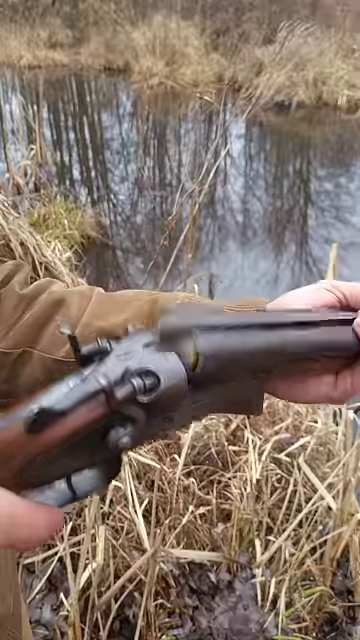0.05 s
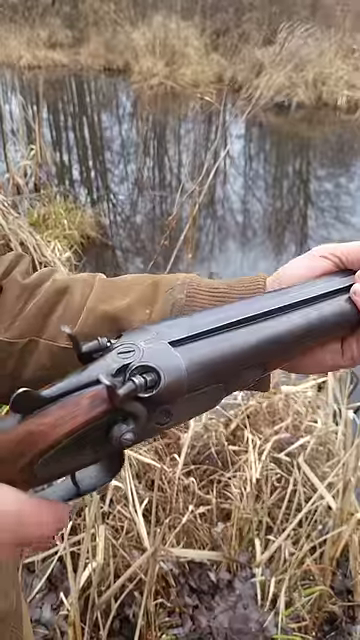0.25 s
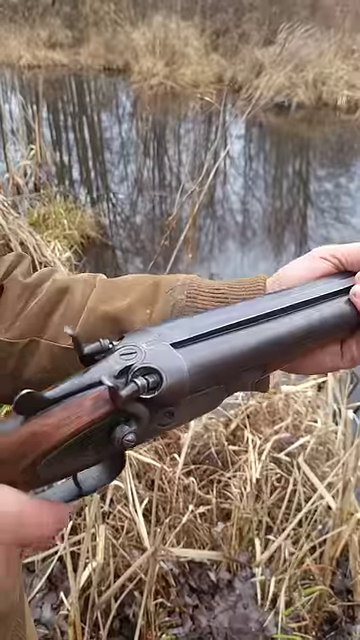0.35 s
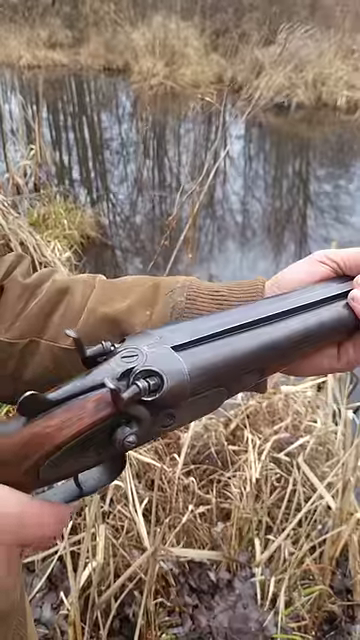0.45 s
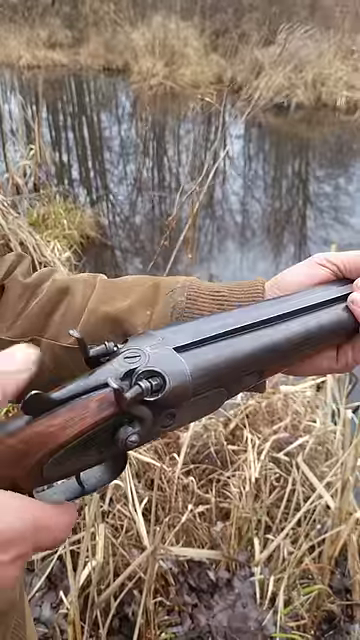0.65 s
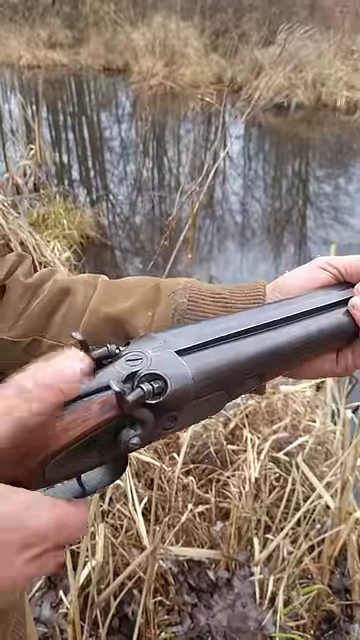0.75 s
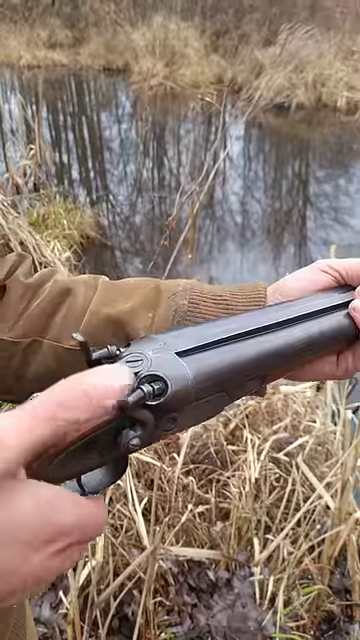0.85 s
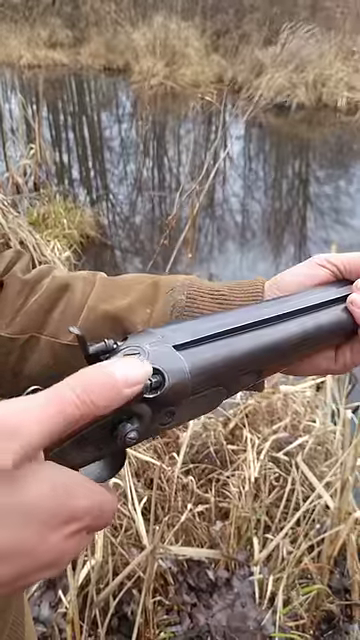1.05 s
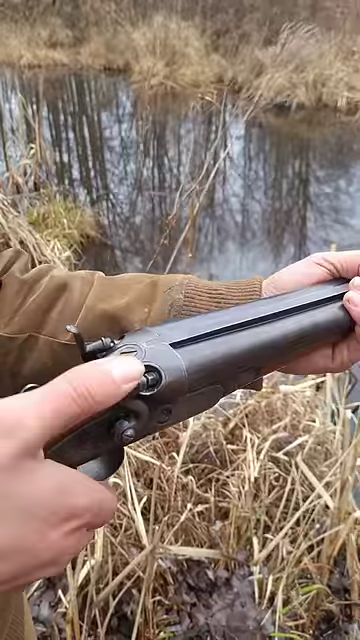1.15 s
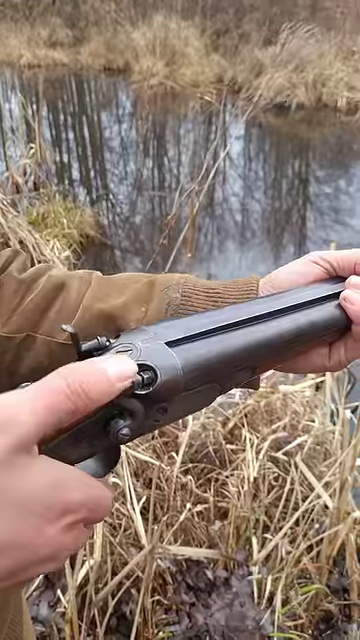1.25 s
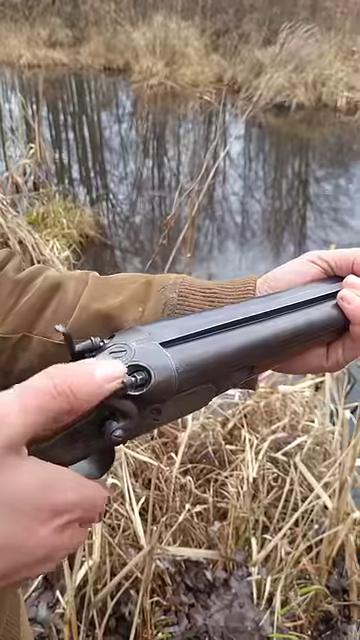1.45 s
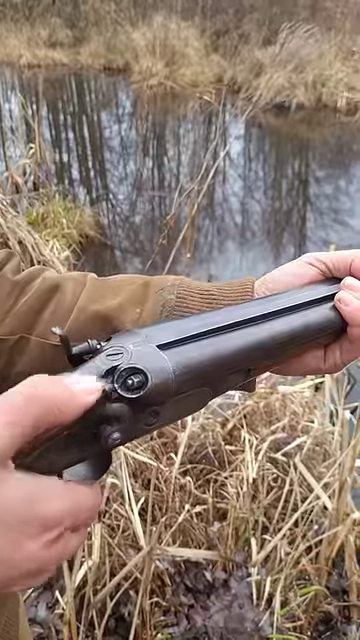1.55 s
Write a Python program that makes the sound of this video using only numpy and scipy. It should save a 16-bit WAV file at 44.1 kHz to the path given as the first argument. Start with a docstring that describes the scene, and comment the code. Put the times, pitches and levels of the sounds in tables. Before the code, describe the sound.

Loud steel clack of a break-action shotgun closing beside a pond, then a soft handling knock

```python
"""A faint rising rub, a fading scrape and a burst of steel clacks: a double-barrel shotgun is swung shut.
It closes an arm's length from a phone on a reedy pond bank, over a low outdoor rumble; later comes a soft knock.
Each metal contact is an impulse that rings modes and filtered noise; scrape and rub are shaped noise.
The thump of the jolt is a swelling low sine. Noise tails scatter the gun off shooter, ground and reeds,
return it from single trunks and banks, and bring it back faintly from the wood across the water."""
import sys
import numpy as np
from scipy import signal
from scipy.fft import rfft, irfft
from scipy.io import wavfile

SR = 44100
rng = np.random.default_rng(int(sys.argv[2]) if len(sys.argv) > 2 else 0)


def transcribe(u):
    """Save the signal u as a 16-bit wav file named by the first command-line argument.

    u: samples, shape (n,) or (channels, n), limited to [-1, 1]; the rate is SR.
    q: integer samples, one column per channel.
    """
    v = np.clip(np.atleast_2d(u).T, -1, 1)
    q = np.round(v * 32767).astype(np.int16)
    wavfile.write(sys.argv[1], SR, q)


N = 70560  # 1.6 s

# In every table the dB are relative: the gain of the layer comes on top.
# Metal contacts of the action. Each row: time in seconds, push on the body in dB,
# shake of the steel in dB, bright tick in dB.
METAL_CONTACTS = [(.1922, -41.5, -43, -60.5), (0.194, -43, -32, -39.5), (0.1985, -27.5, -20.5, -23.5),
                  (0.2003, -23, -15.5, -25.5), (.2128, -23.5, -22, -21), (.2147, -16, -21.5, -29),
                  (.2180, -26.5, -26, -44), (.2305, -29, -36, -43.5), (.23736, -17, -5, -9.5),
                  (.23831, -12, -0.5, -14.5), (.23992, -11, -6.5, -7), (.2420, 0.5, 0, -11),
                  (.24343, -10.5, -3.5, -4), (.2440, -40, 1, 5.5), (.24512, 5, -0.5, 0),
                  (.25051, -9.5, -8.5, -5), (.25268, -7, -10.5, -6), (.25349, -8.5, -12.5, -9.5),
                  (.25859, -25, -27.5, -10), (.26096, -16.5, -15, -12), (.26346, -17, -17.5, -22.5),
                  (.28141, -30, -30, -32)]

# Modes of barrels, frame and stock. Each row: pitch in Hz, t60 in seconds, left in dB, right in dB.
BODY_MODES = [(327, 0.068, -16.5, -17.5), (479, 0.053, -5.5, -24), (607, 0.05, -27.5, -20.5),
              (731, 0.051, -24, -5), (880, 0.052, -12, -9.5), (954.4, 0.039, -21, -13.5),
              (1214, 0.029, -5, -8), (1316, 0.048, -18, -5), (1442, 0.026, -15, 1), (1521, 0.054, -6, -8),
              (1715, 0.058, -16.5, -15), (1973, 0.039, -22.5, -5.5), (2402, 0.045, -15.5, -22.5),
              (3115, 0.05, -17.5, -14)]
BODY_DB, BODY_LOW_HZ, RIGHT_LAG_S = -18.5, 304, .00015

# Colour of the dull knock in each push. Each row: frequency in Hz, left in dB, right in dB.
KNOCK_COLOUR = [(96, -28, -24), (322, -8.5, -13.5), (600, -13.5, -2), (867, -1.5, 8), (1066, -6.5, -11),
                (1350, 0, 9.5), (2000, -6, -0.5), (4000, -27, -33.5), (8997, -48.5, -48)]
KNOCK_DB = 14.5

# Around this pitch the flexing gun drives the two microphones in opposite phase.
TURN_HZ, TURN_WIDTH_HZ = 400, 90

# Colour of the dense high steel modes. Each row: frequency in Hz, left in dB, right in dB.
STEEL_COLOUR = [(200, -28, -28), (900, -16.5, -15), (1600, -6.5, -6), (2400, 3, 3), (3200, 1.5, 1.5),
                (3900, 5, -4), (4800, -6.5, -6.5), (5800, -1, -15), (7080, -1, -23), (8300, -19.5, -42.5),
                (15000, -35.5, -46)]
STEEL_DB, STEEL_SEED_T60_S = 8, .022  # t60 of the noise before crack() evens its spectrum

# Faint ringing of the barrel tubes. Each row: pitch in Hz, t60 in seconds, level in dB.
TUBE_MODES = [(3510, 1, -77.5), (3640, .65, -75), (3560, .55, -75), (3800, .4, -74)]
TUBES_RIGHT_DB = -5.5

# Colour of the tick of the hard edges. Each row: frequency in Hz, left in dB, right in dB.
TICK_COLOUR = [(1000, -29.5, -30.5), (5030, -8, -17.5), (7300, -6, -23), (8500, -16.5, -39),
               (10100, -2.5, -11), (11000, -4, -9.5), (12500, 1, -4.5), (15300, 0.5, -8),
               (16500, -14.5, -20)]
TICK_DB, TICK_SEED_T60_S = 2, .012

# Colour of the sliding bolt. Each row: frequency in Hz, left in dB, right in dB.
SLIDE_COLOUR = [(120, -20.5, -23), (250, -14.5, -11.5), (400, 2, -4), (600, -2.5, -7.5), (950, 1, 2),
                (1300, 0, 3), (1700, -4, -3), (2150, 0, 3), (2750, -3.5, -2), (3175, 1.5, 0),
                (4200, -12, -13.5), (7000, -16, -30), (9000, -38, -43.5), (15000, -35.5, -42.5)]
SLIDE_START_S, SLIDE_END_S = .198, .237
SLIDE_DB, SLIDE_FADE_DB_PER_S = -24, 260
SLIDE_GRAIN = 1.1  # unevenness of the slips

# Low thump of the gun in the hands.
JOLT_S, JOLT_HZ, JOLT_DB = .2452, 58.5, -27
JOLT_PEAK_S, JOLT_WIDTH_S = .268, .020

# Colour of the rubbing hinge. Each row: frequency in Hz, level in dB.
HINGE_COLOUR = [(200, -12.5), (600, 0), (1800, -0.5), (3500, -8), (6000, -20), (15000, -29.5)]
HINGE_DB, HINGE_RISE_DB_PER_S, HINGE_END_S = -57, 246, .195

# Colour of the soft knock of handling. Each row: frequency in Hz, level in dB.
TAP_COLOUR = [(300, -12), (1000, -13), (1650, 4), (2300, -9), (6000, -37)]
TAP_S, TAP_DB, TAP_T60_S = .571, -29.5, .16

# Colour of the scatter from shooter and ground. Each row: frequency in Hz, level in dB.
NEAR_COLOUR = [(200, 0), (1000, -3), (2200, 1), (3800, 1), (5000, 2), (7000, -2), (8500, -3), (10500, 4),
               (16000, 3)]
NEAR_DB, NEAR_T60_S = -23.5, .15

# Colour of the scatter from the reeds. Each row: frequency in Hz, level in dB.
REEDS_COLOUR = [(300, -11.5), (1400, -4), (2600, 1.5), (3200, 0.5), (3700, 6.5), (4200, -7.5), (7000, -15),
                (15000, -23)]
REEDS_DB, REEDS_T60_S = -40.5, .8

# Echoes from single trunks and banks. Each row: delay in seconds, level in dB, t60 in seconds.
TRUNK_ECHOES = [(.132, -46.5, .05), (0.387, -66.5, 0.04), (.494, -55, 0.027), (.528, -55, 0.0084)]
# Colour of those echoes. Each row: frequency in Hz, level in dB.
TRUNK_COLOUR = [(300, -36), (1300, -10.5), (2800, 7.5), (3800, -4.5), (5500, -17.5), (14000, -16)]

# Colour of the wood across the pond. Each row: frequency in Hz, level in dB.
WOOD_COLOUR = [(300, 0), (1200, -3), (1800, -7), (2800, 2.5), (3500, -11), (5400, -6.5), (7000, -24),
               (14000, -25)]
WOOD_DELAY_S, WOOD_RISE_S, WOOD_HOLD_S, WOOD_T60_S, WOOD_DB = .46, .21, .16, .4, -44.5
FAR_CROSSFEED = .15  # share of each side that reeds and distant echoes carry to the other

# Colour of the outdoor rumble. Each row: frequency in Hz, density in dB per Hz.
AIR_COLOUR = [(15, -43), (25, -13), (64, 1.5), (97, -1.5), (120, -3.5), (170, -15), (195, -18.5),
              (229, -14), (270, -24), (309, -19), (503, -29), (659, -25), (1330, -34.5), (1700, -50),
              (16000, -65.5)]
AIR_DB, AIR_SHARED_HZ, AIR_SIDE = -59, 300, .66

TOP_HZ = 15900  # upper limit of the phone


def undb(db):
    """Decibels to gain."""
    return 10 ** (np.asarray(db) / 20)


def colour(x, points, channels=1):
    """Minimum-phase filter through (Hz, dB) points; with two channels, a dB column for each."""
    p, size = np.array(points, float), 2 * N
    log_hz = np.log(np.maximum(np.fft.rfftfreq(size, 1 / SR), 1))
    curves_db = [np.interp(log_hz, np.log(p[:, 0]), p[:, 1 + c]) for c in range(channels)]
    cepstrum = irfft(np.log(undb(curves_db)))
    # Folding the cepstrum forward in time makes the filter causal.
    cepstrum[:, 1:N] *= 2
    cepstrum[:, N + 1:] = 0
    response = np.exp(rfft(cepstrum))
    return irfft(rfft(x, size) * response)[:, :N]


def low_cut(x, hz, order):
    """High-pass filter."""
    return signal.sosfilt(signal.butter(order, hz, "high", fs=SR, output="sos"), x)


def ring(x, response):
    """Play a sound through an impulse response."""
    return irfft(rfft(x, 2 * N) * rfft(response, 2 * N))[..., :N]


def fade(t60, start=0):
    """Exponential decay from a start time, 60 dB down after t60."""
    t = np.arange(N) / SR - start
    return (t >= 0) * np.exp(-np.log(1000) * np.maximum(t, 0) / t60)


def swell(start, rise, hold, t60):
    """Linear attack, hold, exponential release."""
    t = np.arange(N) / SR - start
    release = np.exp(-np.log(1000) * np.maximum(t - rise - hold, 0) / t60)
    return np.clip(t / rise, 0, 1) * release


def unit_energy(x):
    """Scale each channel to an energy of one."""
    return x / np.sqrt(np.sum(x ** 2, axis=1, keepdims=True))


def diffuse(envelope):
    """Dense random response of unit energy under an envelope, different at each microphone."""
    return unit_energy(rng.standard_normal((2, N)) * envelope)


def crack(t60):
    """Short diffuse response whose spectrum is evened out twice, each time under a longer fade."""
    x = diffuse(fade(t60))
    for _ in range(2):
        spectrum = rfft(x)
        flat = irfft(spectrum / (abs(spectrum) + 1e-12), N)
        x = flat * fade(10 * t60)
    return unit_energy(x)


def action():
    """Each contact of the closing gun knocks the body, shakes steel and barrel tubes, and ticks."""
    blows = np.zeros((3, N))
    for s, *db in METAL_CONTACTS:
        blows[:, int(s * SR)] += undb(db)
    push, shake, edge = blows
    low = turn_right(body(push) + knock(push))
    return low + steel(shake) + tick(edge) + tubes(shake)


def body(push):
    """Barrels, frame and stock ring as decaying sines that start slightly later on the right."""
    t = np.arange(N) / SR
    arrival = np.maximum([t, t - RIGHT_LAG_S], 0)
    modes = np.zeros((2, N))
    for hz, t60, left, right in BODY_MODES:
        modes += undb([[left], [right]]) * np.sin(2 * np.pi * hz * arrival) * fade(t60)
    return undb(BODY_DB) * low_cut(ring(push, modes), BODY_LOW_HZ, order=2)


def knock(push):
    """Each push is also a dull knock: its bare impulse, coloured for each microphone."""
    return undb(KNOCK_DB) * colour(push, KNOCK_COLOUR, channels=2)


def turn_right(x):
    """All-pass on the right channel: the low bending modes reach the microphones out of step."""
    b, a = signal.iirnotch(TURN_HZ, TURN_HZ / TURN_WIDTH_HZ, fs=SR)
    return np.array([x[0], signal.lfilter(2 * b - a, a, x[1])])


def steel(shake):
    """High steel modes lie so close together that they ring as a short burst of coloured noise."""
    burst = ring(shake, crack(STEEL_SEED_T60_S))
    return undb(STEEL_DB) * colour(burst, STEEL_COLOUR, channels=2)


def tubes(shake):
    """The hollow barrels ring on faintly as a few slowly decaying high sines, softer on the right."""
    t = np.arange(N) / SR
    modes = sum(undb(db) * np.sin(2 * np.pi * hz * t) * fade(t60) for hz, t60, db in TUBE_MODES)
    return ring(shake, modes) * undb([[0], [TUBES_RIGHT_DB]])


def tick(edge):
    """Hard edges meeting give a bright, very short burst of noise."""
    burst = ring(edge, crack(TICK_SEED_T60_S))
    return undb(TICK_DB) * colour(burst, TICK_COLOUR, channels=2)


def bolt_slide():
    """The bolt scrapes over its lug in tiny uneven slips, fading until the barrels land."""
    t = np.arange(N) / SR
    slips = rng.standard_normal(N) * np.exp(SLIDE_GRAIN * rng.standard_normal(N))
    sliding = (t > SLIDE_START_S) * (t < SLIDE_END_S)
    pressure = sliding * undb(-SLIDE_FADE_DB_PER_S * np.maximum(t - SLIDE_START_S, 0))
    scrape = ring(slips / slips.std() * pressure, crack(0.013))
    return undb(SLIDE_DB) * colour(scrape, SLIDE_COLOUR, channels=2)


def jolt():
    """The closing gun shakes in the hands: a few slow cycles of thump that swell and die."""
    t = np.arange(N) / SR
    thump = np.sin(2 * np.pi * JOLT_HZ * np.maximum(t - JOLT_S, 0))
    return undb(JOLT_DB) * thump * np.exp(-((t - JOLT_PEAK_S) / JOLT_WIDTH_S) ** 2)


def handling():
    """The hinge rubs louder as the barrels come up; later the hand knocks softly on the stock."""
    time_left = HINGE_END_S - np.arange(N) / SR
    pressure = (time_left > 0) * undb(HINGE_DB - HINGE_RISE_DB_PER_S * abs(time_left))
    rub = rng.standard_normal((2, N)) * pressure
    tap = diffuse(fade(TAP_T60_S, TAP_S))
    return colour(rub, HINGE_COLOUR) + undb(TAP_DB) * colour(tap, TAP_COLOUR)


def pond(gun):
    """Scatter from close by and from the reeds, single echoes, and the long return from the far wood."""
    near = undb(NEAR_DB) * colour(diffuse(fade(NEAR_T60_S, 0.0022)), NEAR_COLOUR)
    reeds = undb(REEDS_DB) * colour(diffuse(fade(REEDS_T60_S, .02)), REEDS_COLOUR)
    echoes = sum(undb(db) * diffuse(fade(t60, delay)) for delay, db, t60 in TRUNK_ECHOES)
    trunks = colour(echoes, TRUNK_COLOUR)
    wood_swell = swell(WOOD_DELAY_S, WOOD_RISE_S, WOOD_HOLD_S, WOOD_T60_S)
    wood = undb(WOOD_DB) * colour(diffuse(wood_swell), WOOD_COLOUR)
    crossed = gun + FAR_CROSSFEED * gun[::-1]
    return ring(gun, near) + ring(crossed, reeds + trunks + wood)


def air():
    """Distant rumble of coloured noise, alike at both microphones in the bass and wide above."""
    mid, side = rng.standard_normal((2, N))
    hz = np.fft.rfftfreq(N, 1 / SR)
    side = irfft(rfft(side) * AIR_SIDE * hz / np.hypot(hz, AIR_SHARED_HZ), N)
    rumble = colour(mid + side * np.array([[1], [-1]]), AIR_COLOUR)
    return undb(AIR_DB) * rumble / rumble.std()


def scene():
    """The gun, its jolt and handling, its echoes and the open air."""
    gun = action() + bolt_slide()
    return gun + jolt() + handling() + pond(gun) + air()


def record(dry):
    """The phone rounds the highest peaks and cuts the top."""
    rounded = np.tanh(dry)
    # order 8, 0.2 dB ripple, 70 dB stop band
    top_cut = signal.ellip(8, .2, 70, TOP_HZ, fs=SR, output="sos")
    return signal.sosfilt(top_cut, rounded)


dry = scene()
out = record(dry)
transcribe(out)
```